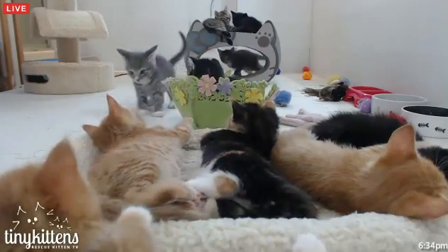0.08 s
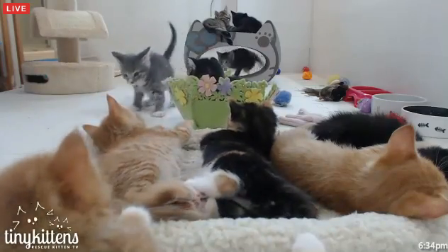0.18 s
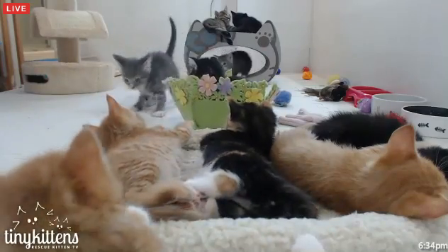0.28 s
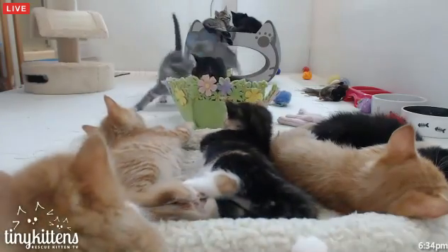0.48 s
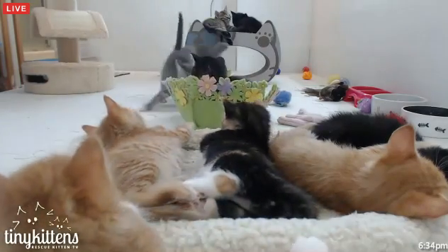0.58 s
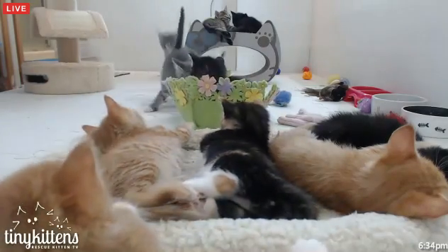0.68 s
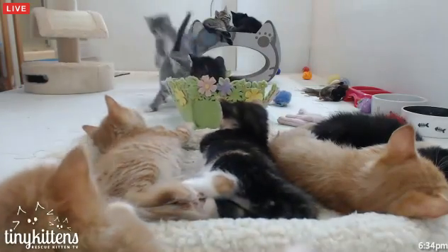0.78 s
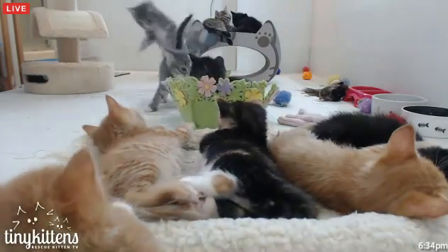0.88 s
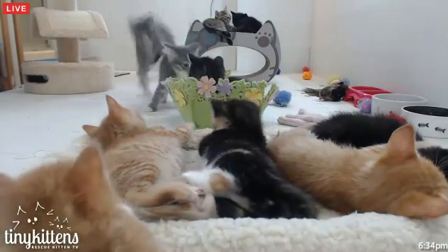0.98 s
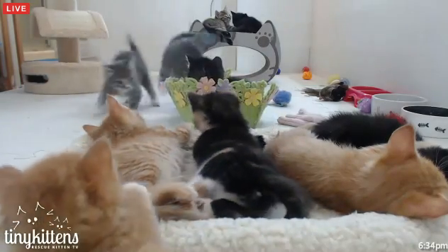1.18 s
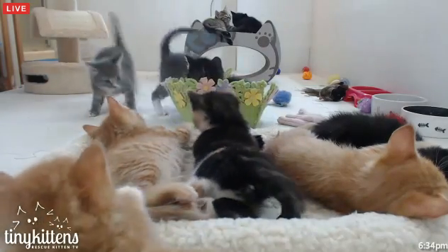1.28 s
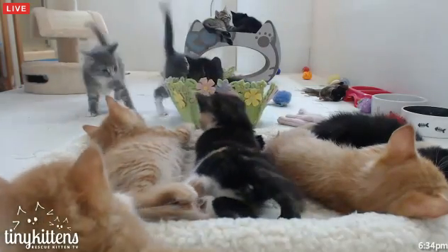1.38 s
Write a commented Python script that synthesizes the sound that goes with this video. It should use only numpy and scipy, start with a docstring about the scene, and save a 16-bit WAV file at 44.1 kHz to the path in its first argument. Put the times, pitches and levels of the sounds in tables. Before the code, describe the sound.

Soft dull thumps of romping kittens on a padded wooden floor, with light claw ticks and scuffs

```python
"""A small quiet room's rumble, hiss and thin electronic whines come first, with soft padding about and scuffs.
Then kittens romp on a padded wooden floor before a webcam microphone with two ports.
Paws and bodies ring the floor's modes and crush its padding; claws are short gritty ticks.
Fur and bedding are coloured noise with fibre snaps, the padding about lumpy noise, the whines sines.
The direct thumps and ticks stand well above the room's tail."""
import sys
import numpy as np
from scipy import signal
from scipy.fft import rfft, irfft
from scipy.io import wavfile
from scipy.ndimage import uniform_filter1d

SR = 44100
rng = np.random.default_rng(int(sys.argv[2]) if len(sys.argv) > 2 else 0)


def natural_amplitude(level_db):
    """Convert a level in decibels to a linear amplitude factor, elementwise."""
    exponent = np.asarray(level_db, float) / 20
    return 10 ** exponent


def transcribe(signal):
    """Save signal, clipped to [-1, 1], as a 16-bit WAV file at the path in sys.argv[1]."""
    frames = np.atleast_2d(signal).T
    limited = np.clip(frames, -1, 1)
    pcm = np.round(limited * 32767).astype(np.int16)
    wavfile.write(sys.argv[1], SR, pcm)


N = 61740  # length [samples]


def evened(x):
    """Scales to rms 1."""
    return x / np.sqrt(np.mean(x ** 2) + 1e-20)


def read(points, hz):
    """Reads a spectrum table on a log-frequency axis."""
    f, value = np.transpose(points)
    return np.interp(np.log(hz + 1), np.log(f + 1), value)


def follow(curve):
    """Turns a level curve into gain per sample."""
    s, db = np.transpose(curve)
    return natural_amplitude(np.interp(np.arange(N) / SR, s, db))


def add(mix, s, sound):
    """Mixes a sound in at s seconds."""
    part = mix[round(s * SR):][:len(sound)]
    part += sound[:len(part)]


# likeness of the two microphone ports: (frequency [Hz], likeness [0 to 1])
PORT_LIKENESS = [(30, 0.92), (180, 0.97), (550, 0.95), (1100, 0.85), (1650, 0.66), (4970, 0.56),
                 (15000, 0.22)]
# tilt between the ports: (frequency [Hz], left over right [dB])
PORT_LEAN = [(25, -2.7), (60, -1.9), (250, -1), (1000, .4), (2000, -.8), (8000, 1), (12000, -.9)]


def pair(a, b, colour):
    """Colours two sources and blends them into the two microphone ports, at rms 1."""
    hz = np.fft.rfftfreq(N, 1 / SR)
    same = np.clip(read(PORT_LIKENESS, hz), -1, 1)
    lean = natural_amplitude(read(PORT_LEAN, hz) / 2)
    a, b = rfft(a), rfft(b)
    outside = (hz < colour[0][0]) | (hz > colour[-1][0])
    gain = natural_amplitude(np.where(outside, -120, read(colour, hz)))
    left = a * lean
    right = (same * a + np.sqrt(1 - same ** 2) * b) / lean
    return evened(irfft(gain * np.array([left, right]), N))


# colour of the room's rumble and hiss: (frequency [Hz], relative density [dB per Hz])
AIR_COLOUR = [(12, -39), (20, -3), (100, -6.5), (182, -17), (252, -14.5), (587, -31), (692, -27.5),
              (1330, -36.5), (2060, -40.5), (3100, -38.5), (7830, -45.5), (13500, -57.5)]
AIR_DB = -48.5  # rms


def air():
    """The quiet room's rumble and hiss: steady coloured noise."""
    return natural_amplitude(AIR_DB) * pair(*rng.standard_normal((2, N)), AIR_COLOUR)


# thin electronic tones: (frequency [Hz], peak level [dB])
WHINE_TONES = [(5459, -75), (5491, -79), (6202, -82.5), (6401, -80.5), (6508, -80.5), (6998, -84.5),
               (7171, -82.5), (7197, -85.5), (7601, -87.5), (8829, -86.5), (9491, -86.5), (9598, -87.5),
               (10541, -85.5)]
FRAMES_PER_S = 29.97
BEEP_HZ, BEEP_DB = 8000, -70.5  # a whine that switches on with every frame
BEEP_START_S, BEEP_ON_S = 0.0012, 0.0105


def whines():
    """Thin steady sines and one that pulses at the frame rate, alike at both ports."""
    t = np.arange(N) / SR
    tones = sum(natural_amplitude(db) * np.sin(2 * np.pi * (hz * t + rng.random())) for hz, db in WHINE_TONES)
    within_frame = (t - BEEP_START_S) % (1 / FRAMES_PER_S)
    on = uniform_filter1d((within_frame < BEEP_ON_S) * 1., 30)
    return tones + natural_amplitude(BEEP_DB) * on * np.sin(2 * np.pi * BEEP_HZ * t)


# soft padding about: (time [s], level [dB])
SHUFFLE_LEVEL = [(0, -54), (.2, -58.5), (.3, -43), (.43, -50.5), (.6, -47), (.7, -42.5), (.8, -46),
                 (.84, -46.5), (.9, -49), (.96, -56), (1.1, -56.5), (1.17, -53), (1.2, -41.5), (1.33, -47),
                 (1.4, -39.5)]
# colour of the soft pads on the floor: (frequency [Hz], relative density [dB per Hz])
PAD_COLOUR = [(24, -47.5), (40, -31), (76, -9.5), (128, -4), (165, -2.5), (355, -9.5), (403, -7.5),
              (511, -10.5), (1800, -34), (2340, -54.5), (3960, -120)]
LUMP_DB = 2.5  # rms swing of the lumps


def shuffle():
    """Soft padding about: lumpy pushes too small to tell apart."""
    push = rng.standard_normal((2, N))
    drift = uniform_filter1d(uniform_filter1d(rng.standard_normal(N), 400), 400)
    lumps = natural_amplitude(LUMP_DB * evened(drift))
    return follow(SHUFFLE_LEVEL) * pair(*(push * lumps), PAD_COLOUR)


# rubbing of fur and bedding: (time [s], level [dB])
SCUFF_LEVEL = [(0, -65), (.06, -63.5), (.11, -57), (.15, -66), (.19, -57.5), (.23, -64.5), (.265, -53),
               (.33, -53.5), (.39, -56.5), (.42, -65), (.46, -69.5), (.475, -57.5), (.56, -60), (.62, -53),
               (.69, -53.5), (.75, -57), (.78, -62.5), (.795, -52), (.83, -59), (.868, -45), (.90, -53.5),
               (.95, -60), (1.165, -82), (1.178, -51.5), (1.25, -59.5), (1.268, -44), (1.295, -54.5),
               (1.322, -45.5), (1.34, -55), (1.4, -56)]
# colour of the rubbing: (frequency [Hz], relative density [dB per Hz])
FUR_COLOUR = [(590, 11), (1000, -0.5), (1590, -12), (1740, -6), (3070, -4), (4830, -13.5), (6630, -16),
              (7950, -24.5), (12700, -25.5), (15000, -57)]
FIBRES_PER_S, FIBRE_DB = 3000, 2.5  # FIBRE_DB scales the unevenness of the snaps
SMOOTH_SHARE = 0.7  # swish against snaps [0 to 1]


def scuff():
    """Fur and bedding rubbing: fibre snaps of uneven size in a smooth swish."""
    size = natural_amplitude(FIBRE_DB * np.minimum(rng.exponential(1, (2, N)), 5))
    snaps = size * (rng.random((2, N)) < FIBRES_PER_S / SR)
    swish = rng.standard_normal((2, N))
    rub = SMOOTH_SHARE * swish + (1 - SMOOTH_SHARE) * evened(snaps * np.sign(swish))
    return follow(SCUFF_LEVEL) * pair(*rub, FUR_COLOUR)


# colour of crushed padding: (frequency [Hz], relative density [dB per Hz])
CRUNCH_COLOUR = [(500, 13.5), (900, -12.5), (1300, -2.5), (1750, -2), (2500, -20), (4000, -40.5),
                 (6000, -52)]


def crunches():
    """Padding crushed: one stretch of coloured grit for each landing."""
    z = rfft(rng.standard_normal((len(LANDINGS), 8192)))
    hz = np.fft.rfftfreq(8192, 1 / SR)
    return evened(irfft(z * natural_amplitude(read(CRUNCH_COLOUR, hz)) * (hz > CRUNCH_COLOUR[0][0])))


# modes of the padded floor: (frequency [Hz], relative level [dB], t60 before damping [s])
FLOOR_MODES = [(69, -5, 0.49), (85, 6, 1), (93.6, 1.5, 0.37), (118, -8.5, 0.12), (157, -3, 0.37),
               (174.6, -5.5, 0.13), (234.1, 7.5, 0.051), (290, -2, 0.051), (357, 4, 0.19),
               (406.9, 5.5, 0.063), (480, 1, 0.067), (529.4, 6, 0.047), (610, 6.5, 0.099), (696, 6, 0.047),
               (800, 3.5, 0.047), (885, -3, 0.17), (944.6, 6.5, 0.026), (1107, -5, 0.18),
               (1420, -10, 0.027), (1677, -7, 0.035)]
# paws and bodies landing: (time [s], level [dB], centre [Hz], swell [s])
LANDINGS = [ (0.227, -20.5, 155.4, 0.0039), (.229, -35, 720, 0.0026), (0.228, -34, 420, 0.0017),
            (0.227, -35.5, 1506, 0.0086), (0.241, -22.5, 399, 0.0062), (.255, -41, 1600, 0.0069),
            (0.255, -28, 432, .005), (.264, -39.5, 1600, .005), (.255, -27, 670, 0.0068),
            (0.259, -14, 118, 0.016), (0.275, -22, 174, 0.0029), (.264, -20.5, 420, 0.0036),
            (.272, -19.5, 388.5, 0.0042), (.298, -32, 407, 0.0072), (.470, -16.5, 476, 0.0014),
            (.471, -29.5, 222, 0.0091), (0.477, -25, 800, 0.0048), (.480, -17.5, 505, 0.0069),
            (0.472, -15, 105.5, 0.0044), (0.485, -14.5, 92.6, 0.0088), (0.497, -36, 1020, 0.0052),
            (0.491, -21, 341, 0.0046), (0.528, -33, 85, 0.02), (0.530, -20, 364, 0.0096),
            (.557, -43, 357, 0.0022), (.530, -47.5, 900, 0.0028), (0.547, -44, 950, 0.0059),
            (.548, -39.5, 514, 0.011), (.645, -38, 414, 0.00504), (.654, -34.5, 415, 0.0051),
            (0.66, -35, 85, 0.0051), (0.681, -36, 222.8, 0.0039), (0.7150, -26, 445, 0.0016),
            (.722, -39.5, 425, 0.0013), (.722, -22.5, 106.6, 0.0062), (0.737, -43, 480, 0.01),
            (0.757, -39.5, 387, 0.0095), (0.781, -45, 407, 0.0075), (0.788, -27, 283, 0.003),
            (0.799, -49.5, 940, 0.0059), (0.788, -52, 1480, 0.0037), (0.811, -56, 940, 0.0048),
            (0.854, -36, 480, 0.009), (.860, -40.5, 800, 0.011), (.867, -49, 630, 0.0043),
            (.880, -39, 885, 0.0032), (0.904, -50, 920, 0.0031), (0.914, -47, 880, .005),
            (.990, -44.5, 508, .005), (1.003, -24, 190.8, 0.0028), (1.004, -32.5, 75, 0.0079),
            (1.061, -37, 75, 0.0086), (1.173, -33, 750, 0.0041), (1.178, -35, 391, 0.011),
            (1.174, -30.5, 156, 0.0059), (1.194, -40, 1030, 0.0069), (1.22, -25, 72.9, 0.012),
            (1.249, -45, 73, 0.0083), (1.257, -30, 455.6, 0.0075), (1.267, -18, 184.3, 0.0056),
            (1.284, -31.5, 154, 0.043), (1.322, -31, 290, 0.0018), (1.368, -27, 290, 0.0099),
            (1.372, -44.5, 810, 0.0017), (1.379, -31.5, 671, 0.0061), (1.372, -33.5, 1420, 0.0065),
            (1.313, -44, 800, 0.0035), (1.392, -39, 1107, 0.0046)]
# how far a blow reaches from its centre to the other modes
SPREAD_OCT, SKIRT_DB, SKIRT_DB_PER_OCT = 0.096, -25.5, -2.5
# the resting weight smothers the ring: dB lost grows with the square of time
DAMP_DB, DAMP_S = -1.5, 0.0048
CRUNCH_DB, CRUNCH_T60_S = -23, 0.094
SHARP_S = 0.0037  # landings slower than this crush the padding more gently


def thump(crunch, s, db, centre_hz, swell_s):
    """A soft weight presses in, rings the floor modes nearest its centre, crushes the padding and rests."""
    t = np.arange(len(crunch)) / SR
    swell_s = max(swell_s, .002)
    press = np.sin(np.pi / 2 * np.minimum(t / swell_s, 1)) ** 2
    after = np.maximum(t - swell_s, 0)
    ring = 0
    for hz, mode_db, t60 in FLOOR_MODES:
        away = abs(np.log2(hz / centre_hz))  # octaves
        reach = np.exp(-.5 * (away / SPREAD_OCT) ** 2) + natural_amplitude(SKIRT_DB + SKIRT_DB_PER_OCT * away)
        ring = ring + reach * natural_amplitude(mode_db - 60 * after / t60) * np.sin(2 * np.pi * hz * t)
    ring = ring * natural_amplitude(DAMP_DB * (after / (swell_s + DAMP_S)) ** 2)
    # low and slow landings crush less
    bright = min(centre_hz / 400, 1) ** 2 * min(SHARP_S / swell_s, 1)
    crushed = bright * natural_amplitude(CRUNCH_DB - 60 * after / CRUNCH_T60_S) * crunch
    return s, natural_amplitude(db) * press * (ring + crushed)


# claws on the floor: (time [s], level [dB], tick [Hz], edge relative to tick [dB])
CLAW_TICKS = [(0.2567, -40, 2780, -22), (0.269, -40, 3140, -17), (0.471, -44, 2330, -23),
              (0.682, -38.5, 3300, -20), (.7930, -41.5, 3370, -22), (1.0081, -49, 2730, -22),
              (1.2163, -35.5, 3040, -23), (1.2270, -44, 3760, -22), (1.259, -33, 1370, -33),
              (1.2608, -37, 2650, -26), (1.262, -37.5, 3830, -25), (1.2655, -32.5, 3100, -22),
              (1.3193, -33.5, 3280, -24), (1.3759, -44.5, 5230, -16)]
CLAW_RISE_S, CLAW_T60_S = 0.0004, 0.008
EDGE_HZ, EDGE_T60_S = 12600, 0.0083
GRIT = 0.35  # rms roughness of the tick's level


def claw(grit, s, db, tick_hz, edge_db):
    """A claw strikes the floor: a short gritty tick with a high edge."""
    t = np.arange(len(grit)) / SR
    tick = natural_amplitude(-60 * t / CLAW_T60_S) * np.sin(2 * np.pi * tick_hz * t)
    edge = natural_amplitude(edge_db - 60 * t / EDGE_T60_S) * np.sin(2 * np.pi * EDGE_HZ * t)
    rise = np.sin(np.pi / 2 * np.minimum(t / CLAW_RISE_S, 1)) ** 2
    return s, natural_amplitude(db) * rise * (1 + GRIT * grit) * (tick + edge)


# how the small room dies away: (frequency [Hz], t60 [s])
ROOM_DECAY = [(80, 0.29), (400, 0.12), (1500, 0.43), (6000, 0.16)]
ROOM_DB = -11.5  # tail energy against the direct sound
ROOM_WIDTH = 0.23  # share that differs between the ports


def room(x):
    """Sparse random taps, each band dying at its own speed; nearly alike at both ports."""
    taps = np.zeros((2, SR // 2))
    slots = np.arange(200, SR // 2 - 20, 20)
    at = slots + rng.integers(0, 20, (2, len(slots)))
    np.put_along_axis(taps, at, rng.choice([-1., 1.], at.shape), 1)
    hz, t, z = signal.stft(taps, SR, nperseg=256)
    fade = natural_amplitude(-60 * t / read(ROOM_DECAY, hz)[:, None])
    middle, side = signal.istft(z * fade, SR, nperseg=256)[1]
    tail = np.array([middle + ROOM_WIDTH * side, middle - ROOM_WIDTH * side])
    tail = tail / np.linalg.norm(tail[0])
    return natural_amplitude(ROOM_DB) * signal.fftconvolve(x[None], tail, axes=1)[:, :N]


BASS_CUT_HZ = 68  # below this the thumps are cut away
THUMP_LEAN_DB, CLAW_LEAN_DB = -0.6, -0.3  # added at the left port, taken off at the right
# in this band the thumps reach the two ports unalike
WIDE_LOW_HZ, WIDE_HIGH_HZ, WIDE_DB, WIDE_LAG_S = 950, 1700, -9, 0.0015


def at_ports(paws, ticks):
    """The direct sound leans between the ports; a late band of thumps has opposite sign at each."""
    sides = np.array([[1], [-1]])
    near = paws * natural_amplitude(THUMP_LEAN_DB * sides) + ticks * natural_amplitude(CLAW_LEAN_DB * sides)
    band_pass = signal.butter(2, [WIDE_LOW_HZ, WIDE_HIGH_HZ], "band", fs=SR, output="sos")
    band = signal.sosfilt(band_pass, paws)
    return near + sides * natural_amplitude(WIDE_DB) * np.roll(band, round(WIDE_LAG_S * SR))


def scene():
    """Thumps and ticks in the room, over scuffing and the quiet air."""
    paws, ticks = np.zeros(N), np.zeros(N)
    for crunch, landing in zip(crunches(), LANDINGS):
        add(paws, *thump(crunch, *landing))
    grits = rng.standard_normal((len(CLAW_TICKS), 1500))
    for _ in range(2):
        grits = uniform_filter1d(grits, size=16, axis=1)
    for grit, row in zip(evened(grits), CLAW_TICKS):
        add(ticks, *claw(grit, *row))
    paws = signal.sosfilt(signal.butter(2, BASS_CUT_HZ, "high", fs=SR, output="sos"), paws)
    under = air() + whines() + shuffle() + scuff()
    return under + at_ports(paws, ticks) + room(paws + ticks)


def low_pass(x):
    """Removes everything above the highest recorded frequency."""
    return signal.sosfilt(signal.butter(12, 15830, fs=SR, output="sos"), x)


MIRROR_HZ, MIRROR_DB = 15800, -60  # the bass reappears faintly below this


def record(dry):
    """The converter adds a faint mirror image: each frequency f also sounds at MIRROR_HZ - f."""
    turn = np.exp(2j * np.pi * MIRROR_HZ * np.arange(N) / SR)
    mirror = natural_amplitude(MIRROR_DB) * (np.conj(signal.hilbert(dry)) * turn).real
    return low_pass(dry + mirror)


dry = scene()
out = record(dry)
transcribe(out)
```